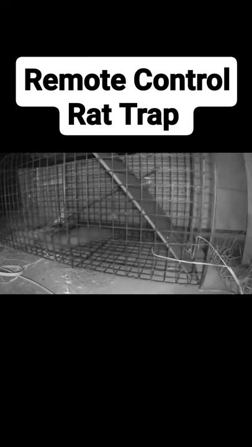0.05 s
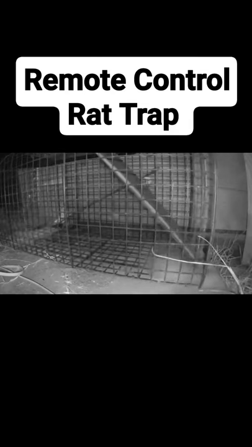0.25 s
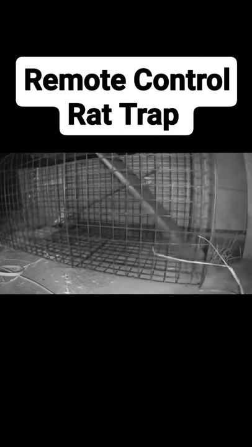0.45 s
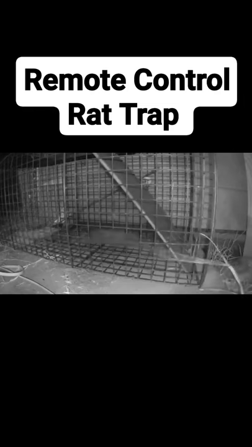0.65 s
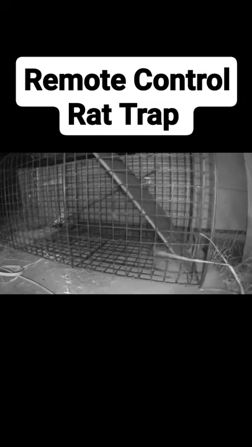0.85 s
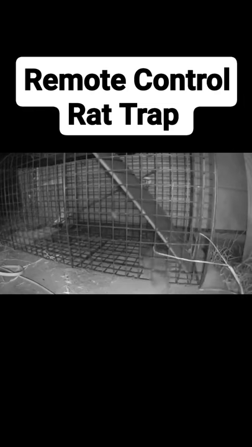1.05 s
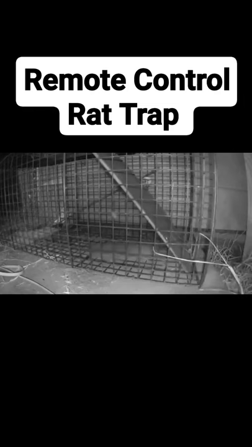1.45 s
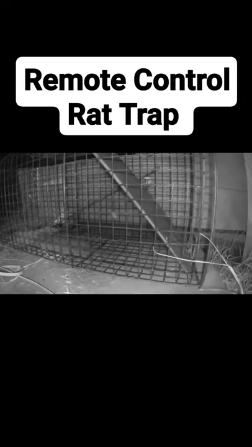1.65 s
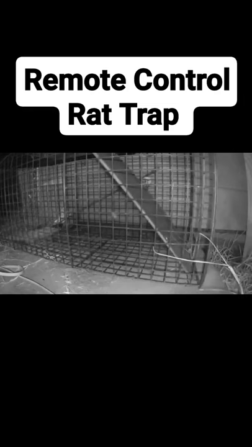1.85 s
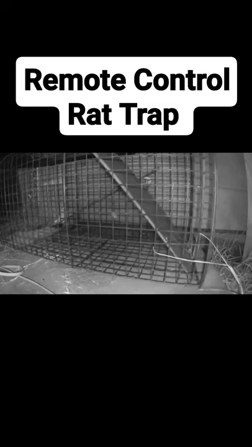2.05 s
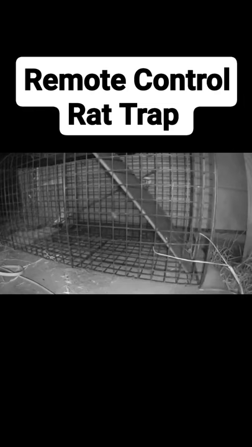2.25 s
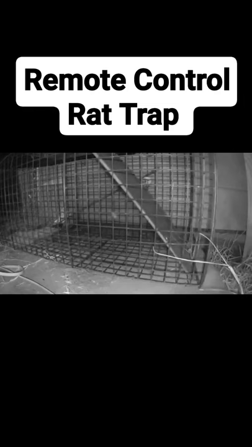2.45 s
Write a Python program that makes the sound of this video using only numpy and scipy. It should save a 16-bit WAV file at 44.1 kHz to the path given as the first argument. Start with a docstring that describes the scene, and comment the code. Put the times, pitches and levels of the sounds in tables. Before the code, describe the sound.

Close up, wire mesh jangles in quick bursts as a rat lunges about a cage, scraping and bumping the floor, with a sharp clink and thin twangs. It settles, then rattles again softly, with faint hiss underneath.

```python
"""A wire cage trap at night: a rat scuffles inside, close to a small camera.
Each lunge or step is a burst of tiny contacts: the mesh jangles, claws and fur scrape, the floor knocks.
Landings rock the trap, slipping wires twang, and a wire clinks against the frame, once sharply.
The camera hisses faintly and keeps little above 7 kHz."""
import sys
import numpy as np
from scipy import signal
from scipy.fft import rfft, irfft, next_fast_len
from scipy.io import wavfile
from scipy.ndimage import map_coordinates

SR = 44100
rng = np.random.default_rng(int(sys.argv[2]) if len(sys.argv) > 2 else 0)


def log_audio(samples):
    """Write samples as a 16-bit WAV file to the path given in sys.argv[1]."""
    # one column per channel
    frames = np.atleast_2d(samples).T
    # limit to full scale, then quantise
    limited = np.clip(frames, -1, 1)
    pcm = np.round(limited * 32767).astype(np.int16)
    wavfile.write(sys.argv[1], SR, pcm)


N = 114660

WEAVE_LOW_HZ, WEAVE_TOP_HZ = 330, 7500  # range of the mesh's lesser wires
SCUFFLE_MAX_S = .6


def amp(db):
    """Decibels to gain."""
    return 10 ** (np.asarray(db) / 20)


def unit(x):
    """Scale to rms 1."""
    return x / np.sqrt(np.mean(x ** 2) + 1e-20)


def unit_energy(ir):
    """Scale to energy 1."""
    return ir / np.linalg.norm(ir)


def decay(t, t60_s):
    """Exponential fade, 60 dB per t60_s."""
    return np.exp(-np.log(1000) * t / t60_s)


def through(x, ir):
    """Convolve; at most N samples."""
    return signal.fftconvolve(x, ir)[:N]


def colour(points, size=4096):
    """Minimum-phase impulse response from (frequency [Hz], gain [dB]) points."""
    hz, db = np.transpose(points)
    log_hz = np.log(np.fft.rfftfreq(size, 1 / SR) + 1)
    gain = amp(np.interp(log_hz, np.log(hz), db))
    cepstrum = irfft(np.log(gain))
    cepstrum[1:size // 2] *= 2
    cepstrum[size // 2 + 1:] = 0
    return irfft(np.exp(rfft(cepstrum)))


def sines(modes):
    """A 0.5 s damped sine per (frequency [Hz], level [dB], t60 [s]) row."""
    t = np.arange(SR // 2) / SR
    return np.array([amp(db) * decay(t, t60_s) * np.sin(2 * np.pi * (hz * t + rng.random()))
                     for hz, db, t60_s in modes])


def ring(modes):
    """Sum of damped modes."""
    return sines(modes).sum(axis=0)


def camera_hiss(level_db=-73.5):
    """Faint, steady coloured noise."""
    # hiss spectrum (frequency [Hz], level [dB])
    spectrum = [(30, -14), (120, -10.5), (300, 7), (700, 4.5), (2000, -1.5), (4700, -14), (7000, -22.5)]
    return amp(level_db) * unit(through(rng.standard_normal(N), colour(spectrum)))


def thumps(rise_s=.014):
    """The rat's weight lands and rocks the whole trap."""
    # landings (time [s], level [dB])
    landings = [(0.188, -53), (.385, -61), (0.672, -54.5), (0.746, -51), (0.934, -54.5), (1.071, -62)]
    # trap rocking on the ground (frequency [Hz], level [dB], t60 [s])
    modes = [(43.2, 2.5, 0.086), (67, 1, .18), (109, -8.5, .12)]
    out, t = np.zeros(N + SR), np.arange(SR // 2) / SR
    attack = 1 - np.exp(-t / rise_s)
    for time_s, db in landings:
        out[round(time_s * SR):][:len(t)] += amp(db) * ring(modes) * attack
    return out[:N]


def twangs(rise_s=.0032, beat_hz=13, twin_db=-9):
    """A wire slips free and swings in two planes, slightly detuned, so it beats."""
    # slipping wires (time [s], pitch [Hz], level [dB], t60 [s])
    slips = [(.371, 4940, -18.5, .07), (.388, 4890, -24, .06), (.388, 4450, -26, .07),
             (.397, 5710, -32, .05), (.425, 4770, -24, .06), (.655, 4300, -28, .45),
             (.657, 4930, -26.5, .4), (.66, 5070, -31, .3), (.66, 5540, -31, .3), (.769, 4800, -28, .2),
             (.905, 4585, -32, .35), (.988, 4890, -32, .35), (.99, 5120, -29, .3),
             (1.957, 4790, -33.5, .07), (2.003, 4640, -37, .1), (2.053, 4790, -39.5, .3),
             (2.055, 4710, -45, .55), (2.057, 4610, -49, .5), (2.059, 4330, -45.5, .5)]
    out, t = np.zeros(N + SR), np.arange(SR // 2) / SR
    attack = 1 - np.exp(-t / rise_s)
    for time_s, hz, db, t60_s in slips:
        tone = ring([(hz, 0, t60_s), (hz + beat_hz, twin_db, t60_s)])
        out[round(time_s * SR):][:len(t)] += amp(db) * tone * attack
    return out[:N]


def weave(count=170, t60_s=.15):
    """Ring of each lesser mesh wire; pitches crowd towards the bass."""
    position = (np.arange(count) + rng.random(count)) / count
    pitches_hz = WEAVE_LOW_HZ + (WEAVE_TOP_HZ - WEAVE_LOW_HZ) * position ** 1.3
    levels_db = 2.3 * np.log10(pitches_hz / 4000)  # offsets the crowding
    return sines([(hz, db, t60_s) for hz, db in zip(pitches_hz, levels_db)])


def spot(wires, spread_db=4):
    """Wires touched at a new spot: each rings with a random share."""
    shares = amp(spread_db * rng.standard_normal(len(wires)))
    signs = np.sign(rng.standard_normal(len(wires)))
    return unit_energy((shares * signs) @ wires)


def mesh_response(wires, bare_db=-3):
    """Response to one touch: the bare contact plus the ringing wires."""
    ir = spot(wires)
    ir[0] += amp(bare_db) * np.sqrt(SR / 2 / WEAVE_TOP_HZ)  # level counted in the weave's band
    return unit_energy(ir)


def clinks(mesh_ir, rise_s=.0018, crack_db=-13, crack_t60_s=.014, mesh_db=-23):
    """A wire strikes the frame, duller when struck softly; the mesh answers."""
    # strikes (time [s], level [dB])
    strikes = [(0.3526, -10), (0.3607, -27), (1.957, -36), (1.986, -36.5), (2.059, -32.5)]
    # struck wire (frequency [Hz], level [dB], t60 [s])
    modes = [(1210, -14.5, 0.018), (2760, -24, .09), (3250, -15.5, 0.24), (4270, -9, 0.042),
             (4536, 1.5, 0.039), (6050, 1, 0.019), (5943, 1, 0.03), (6990, -8, 0.043)]
    # spectrum of the impact (frequency [Hz], level [dB])
    crack_spectrum = [(200, -20), (1200, 7.5), (2000, -13), (4600, -10), (7000, 6), (12000, -9.5)]
    out, t = np.zeros(N + SR), np.arange(SR // 2) / SR
    attack = 1 - np.exp(-t / rise_s)
    caught = amp(-9 * np.clip((t - .0105) / .003, 0, 1))  # the wire is caught again and loses 9 dB
    main_hz = max(modes, key=lambda mode: mode[1])[0]
    for time_s, db in strikes:
        tilt_db_per_hz = (db - strikes[0][1]) / 1000
        tone = ring([(hz, mode_db + tilt_db_per_hz * max(hz - main_hz, 0), t60_s)
                     for hz, mode_db, t60_s in modes])
        noise = unit(through(rng.standard_normal(len(t)), colour(crack_spectrum))[:len(t)])
        crack = amp(crack_db) * decay(t, crack_t60_s) * noise
        out[round(time_s * SR):][:len(t)] += amp(db) * (tone + crack) * caught * attack
    return out[:N] + amp(mesh_db) * through(out, mesh_ir)


def contacts(rate_per_s, spread_db=3, flutter_db=1, flutter_per_s=90):
    """One scuffle's stream of tiny random impacts, fluttering in level; rms 1."""
    size = round(SCUFFLE_MAX_S * SR)
    hits = (rng.random(size) < rate_per_s / SR) * np.sign(rng.standard_normal(size))
    hit_db = spread_db * rng.standard_normal(size)
    knot_position = np.arange(size) * flutter_per_s / SR
    flutter = map_coordinates(rng.standard_normal(256), [knot_position], mode="wrap")
    return unit(hits * amp(hit_db + flutter_db * flutter))


def scuffling(wires, wire_taps_per_s=1200, paw_contacts_per_s=5000):
    """Each lunge or step shakes the mesh, scrapes along it and knocks on the floor."""
    # lunges and steps (time [s], rise [s], t60 [s], jangle [dB], scrape [dB], knock [dB])
    scuffles = [ (-.01, 0.0047, 0.48, -46, -45.5, -59.5), (.078, 0.008, 0.29, -32, -43.5, -58),
                (0.117, 0.014, 1.63, -40, -42, -52.5), (0.186, 0.0057, 0.22, -37, -36.5, -44.5),
                (.322, 0.025, 0.099, -27.5, -37, -45.5), (.366, 0.0049, 0.38, -35, -45.5, -42.5),
                (0.422, 0.0057, 0.34, -36.5, -39.5, -44.5), (.48, 0.0081, 1.62, -41.5, -44.5, -50),
                (0.603, 0.021, 0.36, -36, -41, -51.5), (0.648, 0.0017, 0.15, -19.5, -35, -40.5),
                (.665, 0.0085, 0.46, -22.5, -29.5, -42), (0.72, 0.0055, 0.46, -31.5, -32.5, -71.5),
                (0.767, .005, 0.16, -31.5, -50.5, -49), (0.856, 0.0095, 0.59, -38, -36.5, -41),
                (0.893, 0.0058, 0.58, -30, -38, -42.5), (0.947, 0.046, 0.73, -33.5, -39, -50.5),
                (.982, 0.012, 0.32, -25.5, -37, -44), (1.015, 0.012, 0.2, -29, -36, -43),
                (1.08, 0.0042, 0.094, -33, -39, -39), (1.114, 0.0057, 0.044, -33, -50, -63),
                (1.18, 0.011, 0.3, -48, -59, -59.5), (1.239, 0.0073, 0.11, -43.5, -65, -70),
                (1.363, 0.036, 0.25, -64, -56, -50), (1.422, 0.024, 0.47, -50.5, -58, -73.5),
                (1.495, 0.018, 0.39, -58, -47.5, -55.5), (1.698, 0.022, 0.8, -66.5, -69.5, -65),
                (1.885, 0.0069, 0.86, -65, -66, -83), (1.954, 0.0027, 0.11, -43.5, -45, -71.5),
                (1.983, 0.0044, 0.091, -50, -50.5, -59.5), (2.001, 0.0042, 0.11, -45, -51, -65),
                (2.046, 0.0081, 0.3, -42, -45.5, -56.5), (2.11, 0.018, 0.71, -51, -50.5, -52.5),
                (2.17, 0.018, 0.82, -52, -54, -64.5), (2.305, 0.017, 0.54, -59.5, -65, -66),
                (2.41, 0.026, 0.32, -57, -63, -88), (2.484, 0.01, 0.31, -81.5, -87, -63)]
    # bright mesh wire tones (frequency [Hz], relative level [dB])
    mesh_tones = [(4355, -45.5), (4520, -48.5), (4590, -46.5), (4662, -46.5), (4743, -49), (4856, -44),
                  (4888, -45), (5044, -54.5), (5367, -57.5), (5491, -56)]
    # frame and door rod tones (frequency [Hz], relative level [dB])
    rod_tones = [(1850, -57.5), (1992, -55), (2256, -51.5), (2412, -61.5), (2568, -64), (2751, -56),
                 (3128, -55), (3472, -56), (3575, -57), (3849, -50.5), (3892, -57), (3980, -52.5)]
    # wire-on-wire spectrum (frequency [Hz], relative level [dB])
    jangle_spectrum = [(1500, -38.5), (2800, -11.5), (3700, -7), (4130, -11), (4350, -2), (4900, -3),
                       (5150, -11), (5600, -9.5), (6300, -13), (7000, -22.5)]
    # claw and fur spectrum (frequency [Hz], relative level [dB])
    scrape_spectrum = [(250, -21), (520, -11.5), (800, -8), (1100, -3.5), (1400, 1.5), (1570, 1.5),
                       (1660, -5.5), (1780, 1), (2300, -1.5), (2580, -5), (2900, -2.5), (4000, -8),
                       (7000, -26.5)]
    # cage floor spectrum (frequency [Hz], relative level [dB])
    knock_spectrum = [(20, -23), (40, -15.5), (100, -8.5), (220, -9), (310, -8.5), (480, 2), (700, -7),
                      (1500, -20)]
    mesh_t60_s, rod_t60_s, floor_t60_s = .24, .26, .13
    bright_wires = sines([(hz, db, mesh_t60_s) for hz, db in mesh_tones])
    rods = sines([(hz, db, rod_t60_s) for hz, db in rod_tones])
    jangle_ir, scrape_ir = colour(jangle_spectrum), colour(scrape_spectrum)
    thud = np.pad(unit_energy(colour(knock_spectrum)), (0, SR // 2))[:SR // 2]
    rates_per_s = wire_taps_per_s, paw_contacts_per_s, paw_contacts_per_s
    out, t = np.zeros(N), np.arange(N) / SR
    for time_s, rise_s, t60_s, *levels_db in scuffles:
        start = max(round(time_s * SR), 0)
        age_s = t[start:start + round(SCUFFLE_MAX_S * SR)] - time_s
        envelope = np.clip(age_s / rise_s, 0, 1) * decay(np.maximum(age_s - rise_s, 0), t60_s)
        mesh_ir = mesh_response(wires)
        jangle = unit_energy(through(mesh_ir, jangle_ir)[:len(mesh_ir)])
        scrape = unit_energy(through(mesh_ir, scrape_ir)[:len(mesh_ir)])
        floor_hz = 299 * (1 + .02 * rng.standard_normal())  # shifted by the rat's weight
        floor_note = unit_energy(ring([(floor_hz, 0, floor_t60_s)]))
        bodies = [amp(-1.5) * jangle + amp(-6) * spot(bright_wires),
                  scrape + amp(-6) * spot(rods),
                  thud + amp(-2.5) * floor_note]
        for db, rate_per_s, body in zip(levels_db, rates_per_s, bodies):
            force = amp(db) * envelope * contacts(rate_per_s)[:len(age_s)]
            sound = through(force, body)[:N - start]
            out[start:start + len(sound)] += sound
    return out


def scene():
    """The rat in its cage over a faint hiss; mono."""
    wires = weave()
    return (camera_hiss() + scuffling(wires) + clinks(mesh_response(wires)) + twangs() + thumps())[None]


def record(dry, circuit_db=-87.5, top_hz=15600):
    """Camera: narrow band, circuit noise, brick-wall low-pass."""
    # camera response (frequency [Hz], gain [dB])
    response = [(20, 0), (6850, 0), (7150, -7), (7550, -33), (9000, -45), (10000, -60), (16000, -70)]
    x = through(dry[0], colour(response)) + amp(circuit_db) * rng.standard_normal(N)
    size = next_fast_len(N + SR // 2)
    passband = np.fft.rfftfreq(size, 1 / SR) < top_hz
    return irfft(rfft(x, size) * passband, size)[None, :N]


dry = scene()
out = record(dry)
log_audio(out)
```